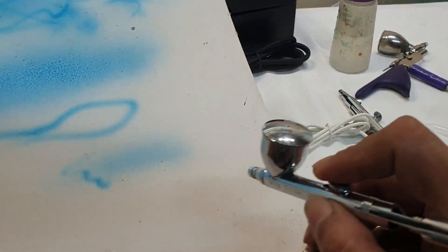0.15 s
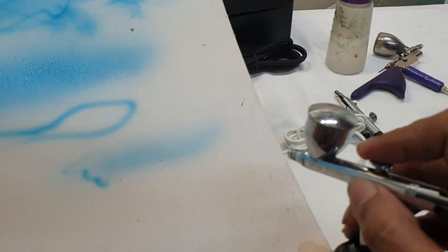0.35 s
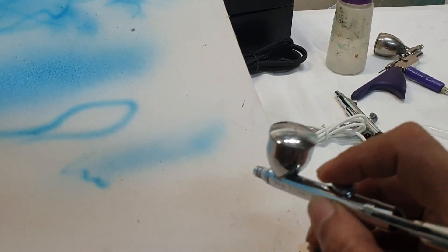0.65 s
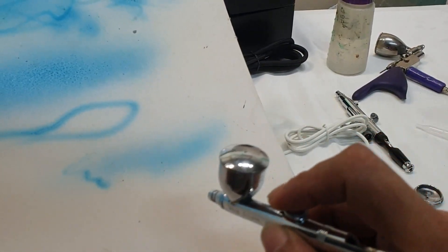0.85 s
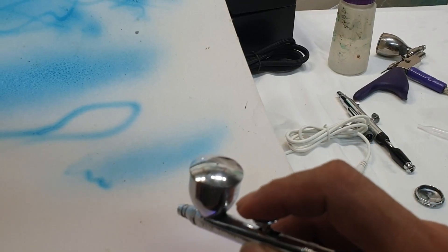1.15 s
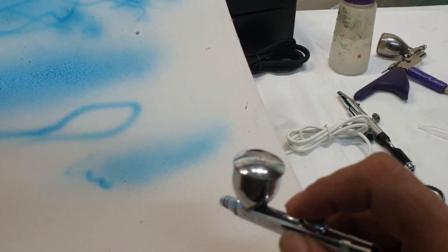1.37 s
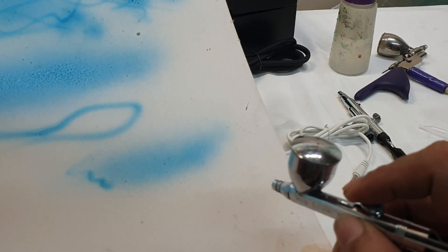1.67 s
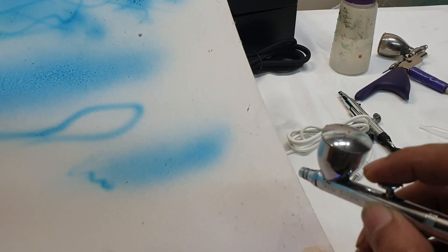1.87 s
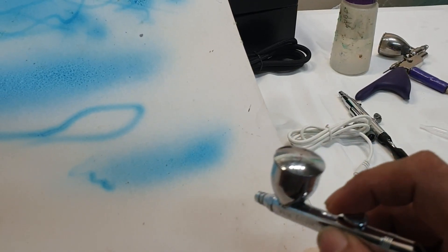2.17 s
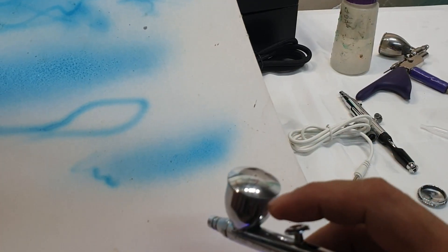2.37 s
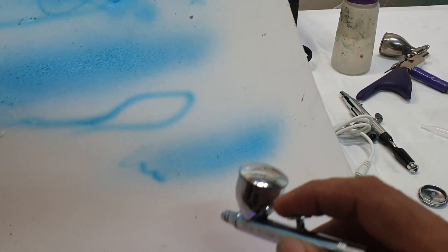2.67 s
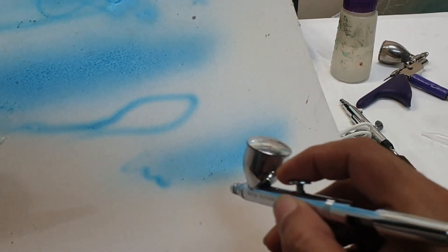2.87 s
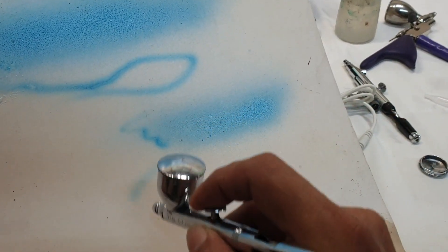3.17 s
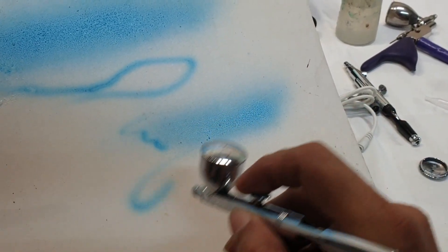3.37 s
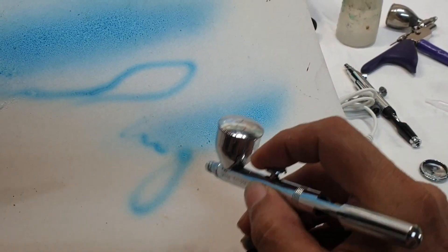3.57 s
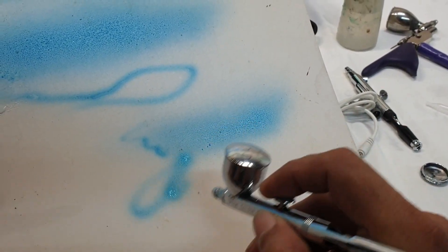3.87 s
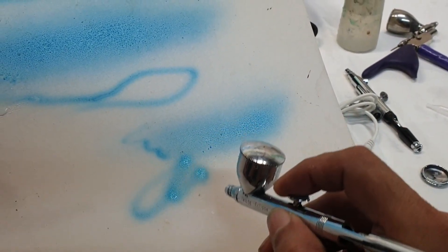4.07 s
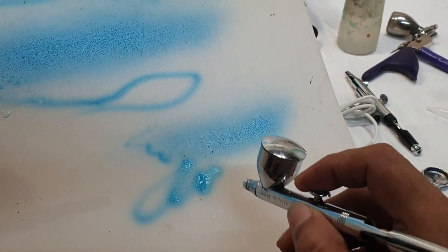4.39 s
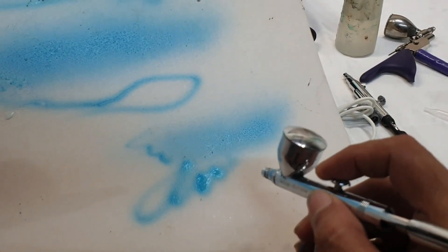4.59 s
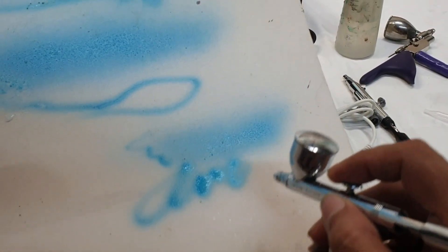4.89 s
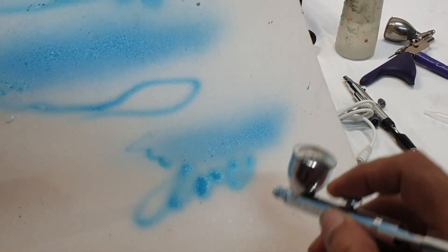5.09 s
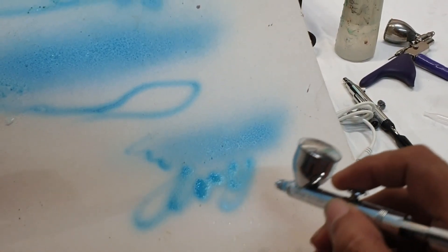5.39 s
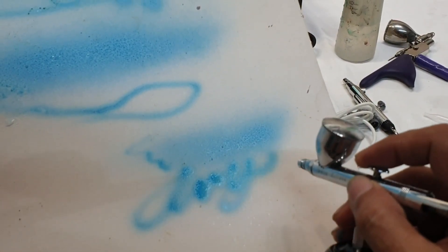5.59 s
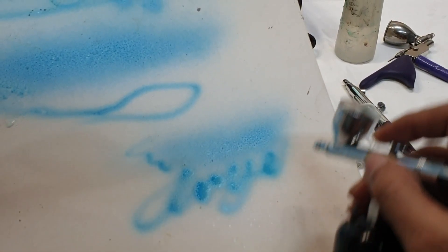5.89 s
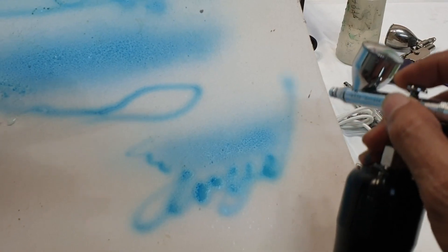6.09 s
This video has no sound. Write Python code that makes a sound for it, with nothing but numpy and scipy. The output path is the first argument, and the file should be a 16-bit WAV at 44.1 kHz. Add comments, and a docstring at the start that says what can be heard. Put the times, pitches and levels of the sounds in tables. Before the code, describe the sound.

In a small room, a cordless airbrush is already spraying, its tiny compressor giving a buzzy whine with a hiss of air. Four times the motor stops with a click, a brief shudder and a fading seep of air, then clicks on again. After the last, longer pause it runs in one long, slightly louder stroke with a softer, wavering hiss. A low appliance hum continues underneath, and everything sounds close and centred.

```python
"""A cordless airbrush sprays paint in a small room, over the hum of an appliance. At first its tiny piston
compressor is already running: it whines at harmonics of about 91 turns a second while the air jet hisses
off the paper. Four times the motor stops: air bleeds away, the trigger clicks, the housing shudders, and
another click restarts it. From 2.9 s a long stroke works against rising back pressure as the finger
feathers the spray; near the end the compressor is lifted away and its whine drops."""
import sys
import numpy as np
from scipy import signal
from scipy.fft import rfft, irfft, next_fast_len
from scipy.io import wavfile
from scipy.ndimage import uniform_filter1d, map_coordinates

SR = 44100
rng = np.random.default_rng(int(sys.argv[2]) if len(sys.argv) > 2 else 0)


def to_wav(sig):
    """Store sig (one row per channel, or 1-D mono) as 16-bit WAV at the path in sys.argv[1].

    Samples outside -1..1 are clipped; the rate is SR.
    """
    pcm = np.clip(np.atleast_2d(sig), -1, 1) * 32767
    pcm = np.round(pcm).astype(np.int16)
    wavfile.write(sys.argv[1], SR, pcm.T)  # frames by channels


N = 275179

# trigger strokes: motor on t/s, motor off t/s, whine level/dB, drift/(dB/s), back pressure (0 or 1)
STROKES = [(-.5, .42, -36.2, 0, 0), (.565, 1.12, -36.5, -2, 0), (1.256, 1.885, -38, -1, 0),
           (2.015, 2.294, -38, 5, 0), (2.905, 7, -34, -0.32, 1)]
# trigger, switch and valve contacts: t/s, relative level/dB, body/dB, brightness/dB, main ring f/Hz
CONTACTS = [(0.4488, -19.5, 4.5, -13, 4370), (0.5643, -27.5, -1, -3, 8800), (.571, -22.5, -5, -14, 3980),
            (1.1457, -17.5, 0.5, -14, 2740), (1.2527, -26.5, -4, 2.5, 8340), (1.261, -20.5, -5.5, -9, 3680),
            (1.915, -20, 6.5, -8, 2900), (2.0124, -22, -2, 1, 8040), (2.0208, -22.5, -7, -10, 4100),
            (2.3246, -23.5, 7, -5.5, 3300), (2.36, -24, 7.5, 2, 2480), (2.909, -22.5, -2.5, -6, 3800)]


def amp(db):
    """Amplitude ratio of a level in decibels."""
    return 10 ** (np.asarray(db) / 20)


def unit(x):
    """Normalisation to rms 1."""
    return x / np.sqrt(np.mean(x ** 2) + 1e-20)


def clock():
    """The time t/s of each sample."""
    return np.arange(N) / SR


def since(s):
    """Seconds since the moment s, zero before it."""
    return np.maximum(clock() - s, 0)


def along(points, hz):
    """Interpolation of (f/Hz, value) points on a logarithmic frequency axis."""
    f, v = np.transpose(points)
    return np.interp(np.log(hz + 1), np.log(f + 1), v)


def wobble(rate):
    """Smooth random modulation, rate knots a second."""
    return map_coordinates(rng.standard_normal(int(N * rate / SR) + 4), [clock() * rate])


def filtered(x, response):
    """Linear filtering: the spectrum of x times a frequency response."""
    m = next_fast_len(N + SR // 2)
    return irfft(rfft(x, m) * response(np.fft.rfftfreq(m, 1 / SR)), m)[..., :N]


def noise(spectrum, patchy_db):
    """Noise of rms 1, coloured by (f/Hz, level/dB) points, with slow patches of random gain."""
    z = signal.stft(rng.standard_normal(N), nperseg=512)[2]
    field = uniform_filter1d(rng.standard_normal(z.shape), size=3, axis=0)
    field = uniform_filter1d(field, size=50, axis=1)
    patchy = signal.istft(z * amp(patchy_db * unit(field)), nperseg=512)[1][:N]
    return unit(filtered(patchy, lambda hz: amp(along(spectrum, hz))))


def appliance_hum(hum_hz=57.68, hum_db=-44, rumble_db=-51):
    """Amplitude modulation makes a low hum throb, under faint higher tones and the room's rumble."""
    # throbs of the hum: f/Hz, depth/dB, first swell t/s
    throbs = [(1.265, 1.66, .122), (4.155, 1.04, .193)]
    # higher tones: f/Hz, level/dB
    partials = [(173.3, -61.5), (231, -61), (280, -55.5), (518, -67)]
    # rumble spectrum: f/Hz, relative level/dB
    rumble = [(20, -22), (35, -18), (50, 11), (90, -2), (120, -2), (160, 4.5), (220, 1), (290, 3.5),
              (400, -2), (700, -4), (1500, -11.5), (3000, -28), (8000, -43), (15000, -50)]
    t = clock()
    throb_db = sum(depth * np.cos(2 * np.pi * rate * (t - swell)) for rate, depth, swell in throbs)
    hum = amp(hum_db + throb_db + .4 * wobble(2.5)) * np.sin(2 * np.pi * hum_hz * t + 0.11 * wobble(4.9))
    tones = sum(amp(level + 3.2 * wobble(5.5)) * np.sin(2 * np.pi * f * t + 0.52 * wobble(7))
                for f, level in partials)
    return np.sqrt(2) * (hum + tones) + amp(rumble_db) * noise(rumble, patchy_db=1.0)


def stroke():
    """The columns of the latest trigger stroke, one value per sample."""
    rows = np.array(STROKES)
    return rows[np.searchsorted(rows[1:, 0], clock())].T


def loaded():
    """True while the pump works against back pressure."""
    return stroke()[-1] > .5


def stroke_age():
    """Seconds since the motor last started."""
    return clock() - stroke()[0]


def pressure(build_s=.9):
    """First-order rise of the back pressure, 0-1."""
    return loaded() * (1 - np.exp(-stroke_age() / build_s))


def powered(release_s):
    """1 while current flows, with exponential decay after the switch opens."""
    return sum((clock() > on) * np.exp(-since(off) / release_s) for on, off, *_ in STROKES)


def running(rise_s, fall_s, drag=.25):
    """Inertia, 0-1: an exponential approach after each start, an ever steeper fall after each stop."""
    coast = lambda u: np.clip(1 - drag * u - (1 - drag) * u ** 2, 0, 1)
    return sum((1 - np.exp(-since(on) / rise_s)) * coast(since(off) / fall_s) for on, off, *_ in STROKES)


def full_speed(free_hz=90.88, loaded_hz=91.2, sag_hz=.75):
    """Rotation frequency once spun up: the load of back pressure slows the motor."""
    return np.where(loaded(), loaded_hz - sag_hz * pressure(), free_hz)


def shaft_angle(speed, flutter=0.00054, judder=0.196):
    """Phase in radians is the integral of speed, which judders while the flywheel is slow."""
    uneven = 1 + flutter * wobble(40) + judder * (1 - speed) * wobble(180)
    return 2 * np.pi * np.cumsum(full_speed() * speed * uneven) / SR


def lift_db(start_s=5.87, takes_s=.22, drop_db=-3.5):
    """Level falls with distance as the hand lifts the compressor away."""
    return drop_db * np.minimum(since(start_s) / takes_s, 1)


def whine_level(surge_db=2.4, surge_at_s=0.14, surge_width_s=0.038, strain_db=3):
    """Level/dB of the whine: it overshoots as the motor reaches speed and grows with back pressure."""
    _, _, level_db, drift_db_per_s, _ = stroke()
    age = stroke_age()
    surge = np.exp(-((age - surge_at_s) / surge_width_s) ** 2)
    return level_db + drift_db_per_s * age + surge_db * surge + strain_db * pressure() + lift_db()


def compressor(whine_db, speed, turn, case_hz=1790, case_width_hz=90, tilt_db=0.35, slack_db=-6):
    """Shaft harmonics drone and whine; the piston's load modulates the whine's phase within each turn."""
    # shaft harmonics: order, relative level/dB blowing freely, relative level/dB against pressure
    harmonics = [(4, -59, -57), (6, -61, -60), (7, -55, -55.0), (8, -49.5, -51), (9, -48.5, -47.5),
                 (11, -48.5, -52.5), (12, -52, -55), (13, -45.5, -49.5), (14, -62, -57), (15, -50, -58),
                 (16, -46.5, -45), (17, -48, -48), (18, -46, -50), (19, -37.5, -39.5), (20, -44.5, -46.5),
                 (21, -37.5, -32), (22, -51, -49.5), (23, -40, -37.5), (24, -46, -40), (25, -49, -44),
                 (26, -63, -65), (27, -59, -58)]
    last_drone_order, first_whine_order, carrier_order = 9, 18, 21
    cycle = np.linspace(0, 2 * np.pi, num=128, endpoint=False)
    swing = 3.4 * np.sin(cycle) + 1.5 * np.cos(2 * cycle)
    sideband_phase = np.angle(rfft(np.cos(carrier_order * cycle + swing)))
    load, shaft_hz = loaded(), full_speed()
    ringing = np.where(load, 1.0, 3.0)  # load damps the case
    resonance = lambda hz: 1 + ringing / (1 + ((hz - case_hz) / case_width_hz) ** 2)
    whine_sizes = [amp(levels) for k, *levels in harmonics if k >= first_whine_order]
    free_rms, loaded_rms = np.linalg.norm(whine_sizes, axis=0)
    whine = amp(whine_db) / np.where(load, loaded_rms, free_rms)
    drone = amp(np.where(load, 3 - 1.66 * stroke_age(), 0.6))  # thins steadily against pressure
    middle = amp(0.37 * lift_db())
    # against pressure the pump bites at once; blowing freely it needs speed first
    force = powered(release_s=0.04) * speed ** np.where(load, 2, 4)
    out = np.zeros(N)
    for k, free_db, loaded_db in harmonics:
        size = np.where(load, amp(loaded_db), amp(free_db))
        # lower orders arrive by many paths, in scattered phase; the whine radiates directly
        phase = 2 * np.pi * rng.random() + 0.1 * wobble(1.96)
        if k >= first_whine_order:
            size *= whine * amp(tilt_db * (k - carrier_order))
            phase = sideband_phase[k]
        else:
            size *= drone if k <= last_drone_order else middle
        if k == carrier_order:  # under load it stands out only once pressure has built
            size *= amp(slack_db * (load - pressure()))
        size *= resonance(k * shaft_hz * speed) / resonance(k * shaft_hz)  # gliding past the case mode
        size *= amp(.9 * wobble(2))  # the moving hand shifts each order's strength
        out += np.sqrt(2) * size * np.cos(k * turn + phase)
    return force * out


def pump_air(whine_db, speed, turn, pulsing=0.16, chuff_db=-14, rattle_db=-39.5):
    """Pulsating flow chuffs through the valves once a turn; the piston rattles while the speed changes."""
    # valve noise spectrum: f/Hz, relative level/dB
    spectrum = [(200, -22), (500, -14.5), (900, -16), (1300, -9), (1650, -2), (1830, 1.5), (2100, -2),
                (2350, -6.5), (2520, -39), (3000, -32)]
    rattle = 6 * speed ** 3 * np.abs(1 - speed)
    envelope = (amp(whine_db + chuff_db) * speed + amp(rattle_db) * rattle) * powered(release_s=0.071)
    return envelope * (1 + pulsing * np.cos(turn)) * noise(spectrum, patchy_db=-2.0)


def hiss_level(open_db=-43, ease_db=-4.5, ease_s=0.016):
    """Throttling sets the level/dB: open in bursts, feathered in the long stroke, eased before a stop."""
    # hiss under the feathering finger: t/s, level/dB
    feathering = [(3.1, -49.5), (3.38, -45.5), (4.58, -46.5), (4.83, -45), (5.0, -48), (5.22, -45),
                  (5.34, -50.5), (5.46, -45.5), (6.2, -46.5)]
    feathered_db = np.interp(clock(), *np.transpose(feathering))
    time_left = np.maximum(stroke()[1] - clock(), 0)
    return np.where(loaded(), feathered_db, open_db) + ease_db * np.exp(-time_left / ease_s)


def nozzle(hiss_db, jet_gain_db=1.26, puff_db=-45, puff_lead_s=0.0016, puff_width_s=0.0088):
    """A turbulent jet builds with pump pressure; stored air puffs out as the valve opens."""
    # jet spectra, blowing freely and against pressure: f/Hz, relative level/dB
    free_spectrum = [(1500, -3.5), (2700, -3), (3450, 1.5), (4350, -2.5), (5150, 1.5), (5750, -1),
                     (6700, 3.5), (8300, -1.5), (9900, -0.5), (11600, -8.5), (12500, -8.5), (14000, -10.5),
                     (15800, -18)]
    loaded_spectrum = [(1500, -25), (2700, -4), (3250, -1), (3550, 2.1), (3950, -3), (4400, -4.5),
                       (6300, -2.5), (7700, -1), (9400, -4.5), (10400, -5.5), (12600, -15), (13600, -12.5),
                       (15800, -21)]
    jet = np.where(loaded(), noise(loaded_spectrum, patchy_db=1.2), noise(free_spectrum, patchy_db=1.5))
    flow = running(rise_s=0.051, fall_s=0.0014)
    puff = sum(np.exp(-((clock() - on + puff_lead_s) / puff_width_s) ** 2) for on, *_ in STROKES)
    spit = noise([(2500, -11), (5000, -10), (8000, -2.0), (11000, -13), (15000, -43)], patchy_db=5.0)
    return amp(hiss_db + jet_gain_db) * flow * jet + amp(puff_db) * puff * spit


def paper_reflection(x, echo=0.19, delay_ms=0.795, sway=0.153):
    """Comb filtering: the hiss interferes with its echo off the paper; the moving hand varies the delay."""
    lag = SR * delay_ms / 1000 * np.exp(sway * wobble(2))
    return (x + echo * map_coordinates(x, [np.arange(N) - lag])) / np.hypot(1, echo)


def bleed(stop_db=-44, fade_db_per_s=140, leak_db=-53.5, leak_hold_s=0.33, leak_fade_db_per_s=88):
    """Exponential decay: after each stop the remaining air seeps out through the pump."""
    # seeping air spectrum: f/Hz, relative level/dB
    spectrum = [(300, -20), (700, 5.5), (1400, -2.5), (1780, 3), (2050, 0.5), (2450, 1), (3400, -12),
                (5400, -8.5), (6200, -16), (7000, -9), (8200, -19), (10500, -15.5), (12200, -33),
                (15800, -30)]
    t = clock()
    tail = sum((t > off) * amp(stop_db - fade_db_per_s * since(off)) for _, off, *_ in STROKES)
    # in the long pause air leaks evenly, then runs out
    closed_s = CONTACTS[-2][0]
    pause = (t > closed_s) & (t < STROKES[-1][0])
    leak = pause * amp(leak_db - leak_fade_db_per_s * since(closed_s + leak_hold_s))
    return (tail + leak) * noise(spectrum, patchy_db=-1.0)


def clicks(gain_db=-6, crack=0.59, crack_t60=0.012, main=0.72, main_t60=0.021, chatter_s=0.0029):
    """Impact excitation: each contact rings the handpiece and its own main mode; sliding metal rasps."""
    # modes of the handpiece: f/Hz, relative level/dB, t60/s
    modes = [(1300, -1, 0.012), (1756, 4.5, 0.024), (2480, -24, 0.0089), (2840, -4, 0.013),
             (3560, -1.5, 0.018), (4350, -2, 0.015), (5370, -5.5, 0.027), (5710, -5, 0.028),
             (7070, 2.5, 0.01), (8800, -1, 0.0098), (10710, 1.5, 0.017)]
    # rasp spectrum: f/Hz, relative level/dB
    rasp_spectrum = [(300, 0.5), (1500, -2.5), (6000, -4), (11000, -2), (15000, -21)]
    out, t = np.zeros(N + SR), np.arange(SR // 8) / SR
    hz, mode_db, t60 = np.transpose(modes)[:, :, None]
    bins_hz = np.fft.rfftfreq(len(t), 1 / SR)
    attack = 1 - np.exp(-t / .0001)
    # the contact chatters for a moment before it rings freely
    contact = crack * amp(-60 * t / crack_t60) + 0.25 * np.exp(-(t / chatter_s) ** 4)
    for start_s, level_db, body_db, bright_db, main_hz in CONTACTS:
        colour = [(1800, body_db), (2500, 0), (6000, 0), (7500, bright_db)]
        scatter_db = rng.normal(0, 2, hz.shape)
        size = amp(mode_db + along(colour, hz) + scatter_db - 60 * t / t60)
        ring = np.sum(size * np.sin(2 * np.pi * (hz * t + rng.random(hz.shape))), axis=0) / 2
        ring += main * amp(-60 * t / main_t60) * np.sin(2 * np.pi * main_hz * t)
        rasp_db = along(colour, bins_hz) + along(rasp_spectrum, bins_hz)
        rasp = unit(irfft(rfft(rng.standard_normal(len(t))) * amp(rasp_db), len(t)))
        out[round(start_s * SR):][:len(t)] += amp(level_db + gain_db) * (ring + contact * rasp) * attack
    return out[:N]


def shudder(speed, order=4.5, delay_s=0.038, width_s=0.028, tone_db=-36, rough=0.41, thump_db=-45):
    """Forced vibration: the braking rotor shakes the housing, a rough falling tone over a dull thump."""
    swell = sum(np.exp(-np.abs(clock() - off - delay_s) / width_s) for _, off, *_ in STROKES)
    swell *= 1 - speed ** 8
    turn = shaft_angle(speed, judder=0.14)  # the heavy housing judders less than the shaft
    tone = np.sqrt(2) * np.sin(order * turn) * (1 + rough * wobble(150)) * speed ** .25
    # thump spectrum: f/Hz, relative level/dB
    spectrum = [(100, -33), (180, -6), (300, -3), (450, -4), (800, -10), (1300, -7), (2500, -40)]
    return swell * (amp(tone_db) * tone + amp(thump_db) * noise(spectrum, patchy_db=-11.0))


def room(x):
    """Reverberation: convolution with a diffuse tail in which each frequency decays at its own rate."""
    # reverberation times: f/Hz, t60/s
    decay_times = [(200, 0.36), (2000, 0.25), (5500, .24), (12000, 0.074)]
    hz, t, z = signal.stft(rng.standard_normal(SR // 2), SR, nperseg=256)
    tail = signal.istft(z * amp(-60 * t / along(decay_times, hz)[:, None]), SR, nperseg=256)[1]
    return signal.fftconvolve(x, tail / np.linalg.norm(tail))[:N]


def scene():
    """Superposition, heard from the centre: one shaft drives whine, chuffing and shudder."""
    whine_db = whine_level()
    speed = running(rise_s=.026, fall_s=.09)
    turn = shaft_angle(speed)
    knocks = clicks() + shudder(speed)
    air = paper_reflection(nozzle(hiss_level())) + pump_air(whine_db, speed, turn) + bleed()
    mono = compressor(whine_db, speed, turn) + air + knocks + amp(-9.5) * room(knocks) + appliance_hum()
    return np.array([mono, mono])


def record(dry):
    """Band limiting: an ideal low-pass filter at 15850 Hz."""
    return filtered(dry, lambda hz: hz < 15850)


dry = scene()
out = record(dry)
to_wav(out)
```